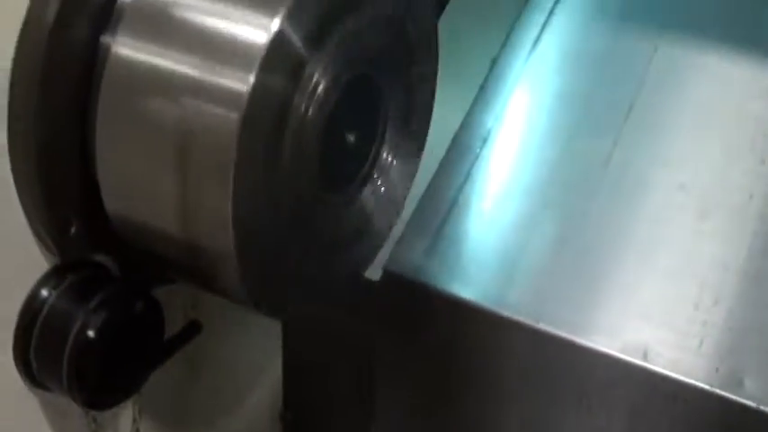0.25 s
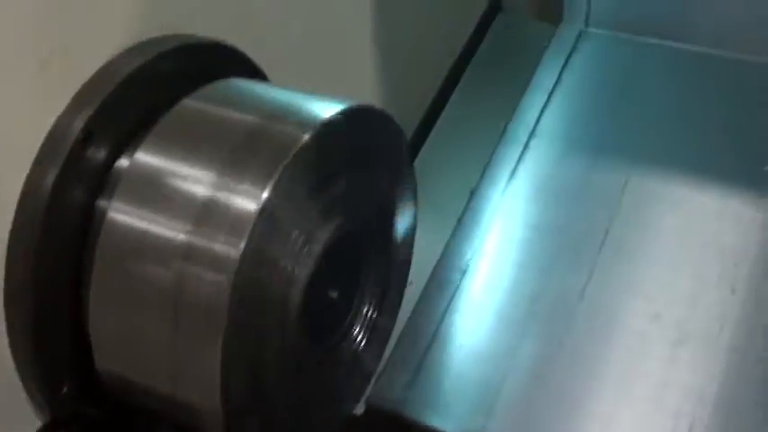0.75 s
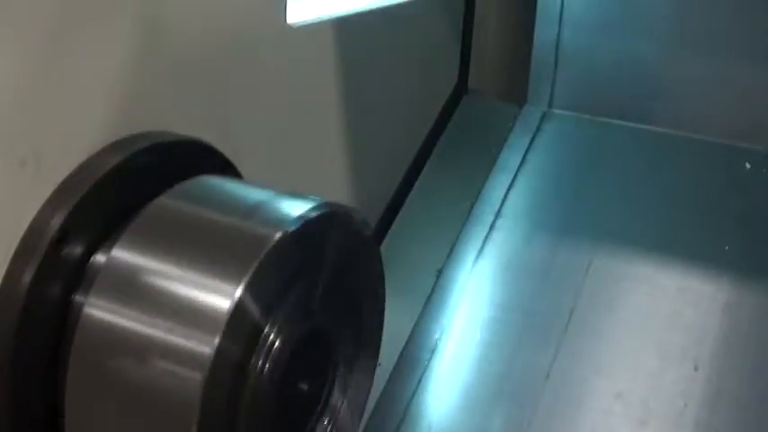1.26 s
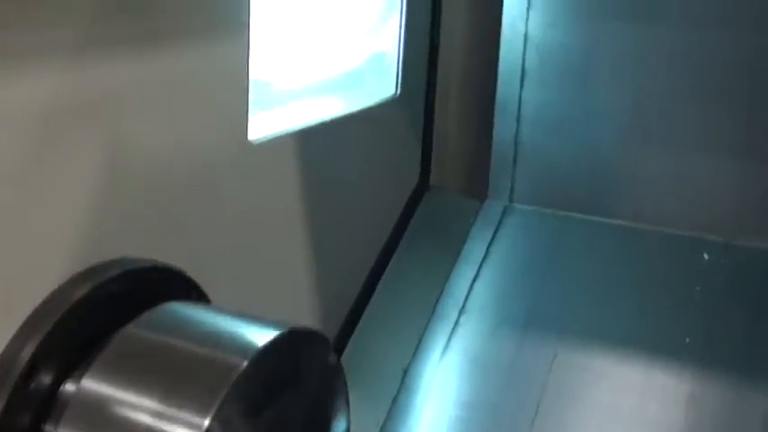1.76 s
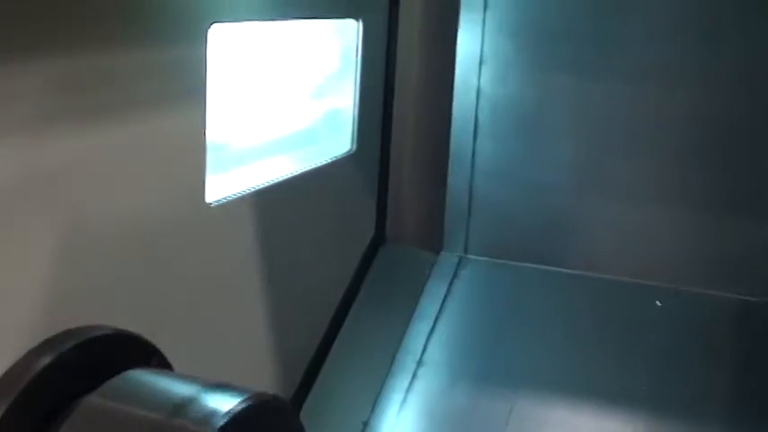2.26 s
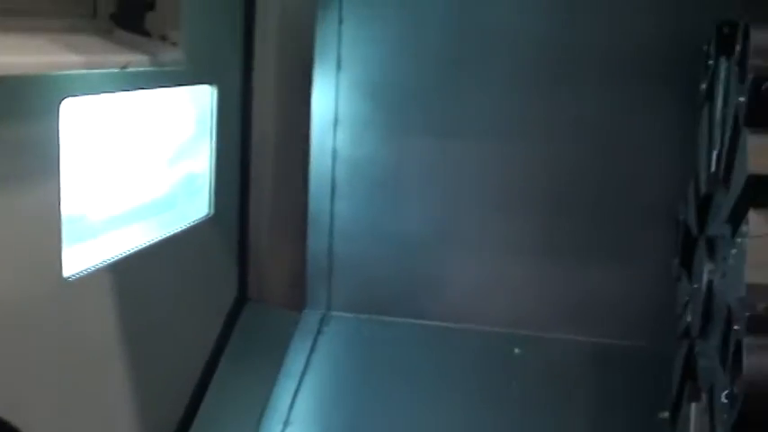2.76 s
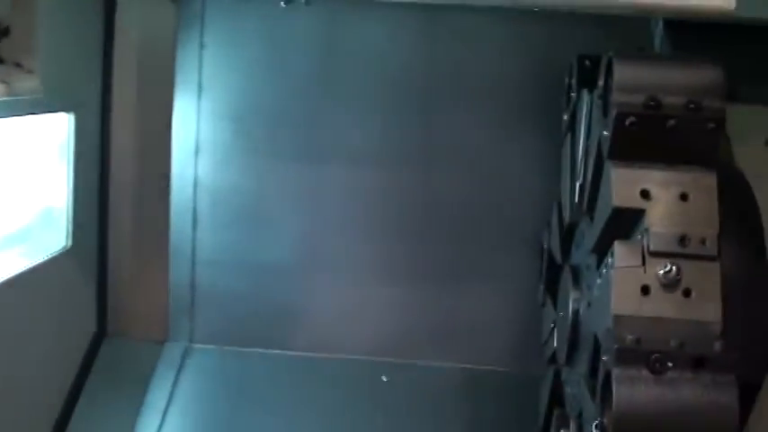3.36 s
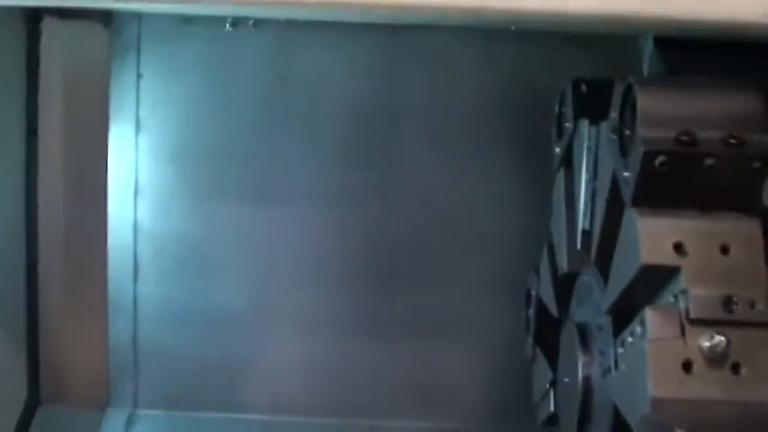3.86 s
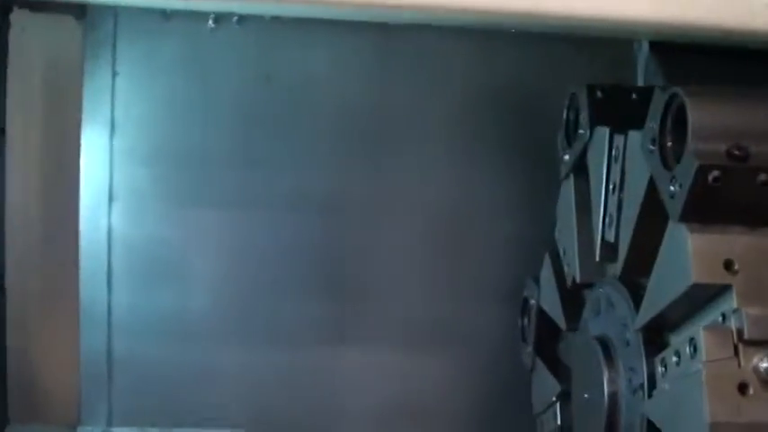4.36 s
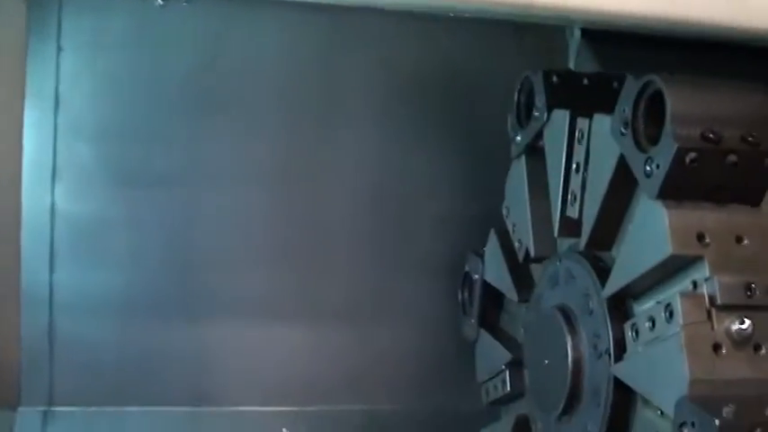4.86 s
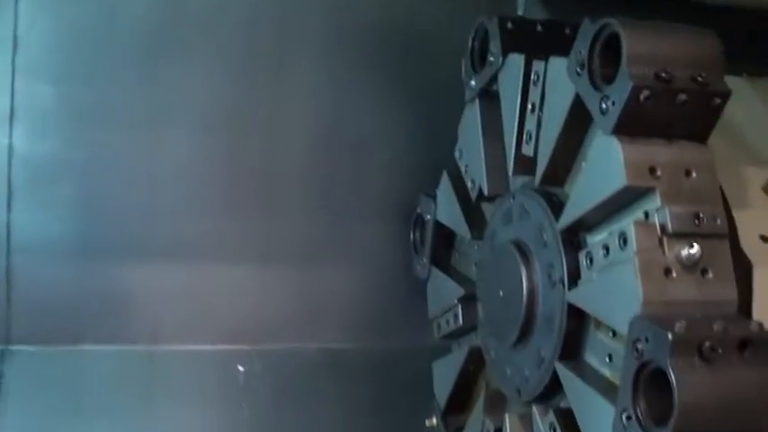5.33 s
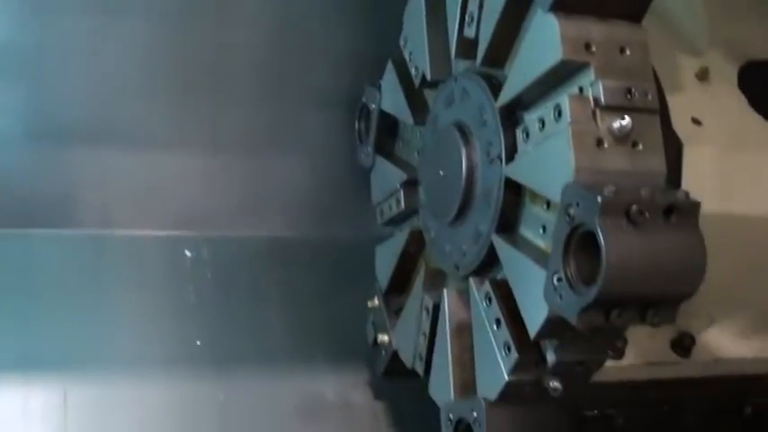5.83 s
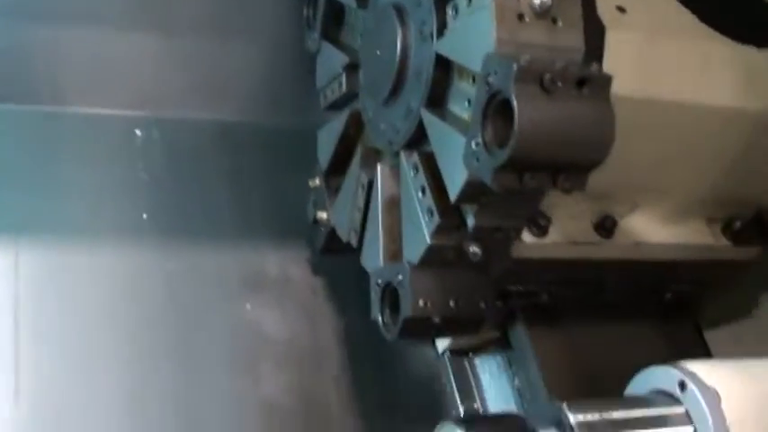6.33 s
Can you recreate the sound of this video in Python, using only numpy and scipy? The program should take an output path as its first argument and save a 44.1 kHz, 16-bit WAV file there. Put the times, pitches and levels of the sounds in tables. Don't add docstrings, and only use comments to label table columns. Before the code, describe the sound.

Inside the metal enclosure of an idling lathe, a hydraulic pump sings a strong, steady mid-pitched whine over a lower throbbing vane tone, motor, belt and gear hum and dull air rush. The whine grows until nearly four seconds, then collapses around four and a half, leaving a duller, lower drone to the end. Close stereo microphone, moving slowly; no cutting or impacts.

```python
import sys
import numpy as np
from scipy import signal
from scipy.fft import rfft, irfft, next_fast_len
from scipy.io import wavfile

SR = 44100
rng = np.random.default_rng(int(sys.argv[2]) if len(sys.argv) > 2 else 0)


def boost_factor(decibels):
    exponent = np.asarray(decibels, float) / 20
    return 10 ** exponent


def unload_wav(signal):
    wavfile.write(
        sys.argv[1],
        SR,
        np.round(np.clip(np.atleast_2d(signal).T, -1, 1) * 32767).astype(np.int16),
    )


N = 290619
RUN_IN = 4096
SIZE = next_fast_len(N + 2 * RUN_IN)
HZ = np.maximum(np.fft.rfftfreq(SIZE, 1 / SR), 1)
TIME = (np.arange(SIZE) - RUN_IN) / SR

PUMP_SHAFT_HZ = 29.753
VANE_HZ = PUMP_SHAFT_HZ * 13
APPROACH_HZ, APPROACH_ENDS_S = .045, 3.4
GEAR_HZ, BELT_HZ, FAN_HZ = 106.8, 8.4265, 419.4


def in_time(rows):
    s, *columns = np.transpose(rows)
    return [np.interp(TIME, s, c) for c in columns]


def at_hz(rows, hz):
    f, *columns = np.transpose(rows)
    return [np.interp(np.log(hz), np.log(f), c) for c in columns]


def drift(rate_hz):
    pole = np.exp(-200 * np.pi * rate_hz / SR)
    noise = rng.standard_normal(SIZE // 100 + 2002)
    slow = signal.lfilter([1], [1, -2 * pole, pole * pole], noise)[2000:]
    slow = slow - slow.mean()
    return np.interp(np.arange(SIZE) / 100, np.arange(len(slow)), slow / slow.std())


def tone(hz, db, turn_lag_s=0.):
    return np.sqrt(2) * boost_factor(db) * np.sin(2 * np.pi * hz * (TIME + turn_lag_s))


def shaft(base_hz, orders, swell_db, turn_lag_s):
    total = np.zeros(SIZE)
    for k, db in orders:
        total += tone(base_hz * k, db + swell_db * drift(0.94), turn_lag_s + rng.random())
    return total


def beating(base_hz, rows):
    return sum(tone(hz, db, (base_hz / hz - 1) * s) for hz, db, s in rows)


def across_node(before_db, after_db, crossing_s, swell_db):
    past = .5 + .5 * np.tanh((TIME - crossing_s) / 0.11)
    return before_db + (after_db - before_db) * past + swell_db * drift(2.6)


# (frequency [Hz], density [dB per Hz])
ENCLOSURE = [(20, -89), (35, -74.5), (55, -69), (75, -69), (105, -61.5), (160, -61), (190, -59.5), (220, -58),
             (260, -57.5), (290, -52.5), (320, -56.5), (365, -53), (400, -63.5), (450, -64.5),
             (520, -63), (580, -61.5), (630, -59), (680, -62), (740, -62), (860, -62.5), (950, -61),
         (1100, -67.5), (1300, -72.5), (1600, -71.5), (1900, -70), (2200, -68.5), (2450, -73.5),
         (2750, -81)]
# (frequency [Hz], density [dB per Hz])
DUCT = [(2750, -80), (3000, -75.5), (3250, -69.5), (3500, -80), (3900, -85.5), (4300, -89.5), (4800, -88.5),
        (5400, -93), (5900, -96), (6350, -96), (6700, -102), (8000, -107), (11000, -120)]
# (frequency [Hz], width [Hz], lift [dB])
WHISTLES = [(1404, 12, 6.5), (1564, 17, 3.5), (3140, 20, -0.5), (3445, 22, 5), (3970, 28, 2.5),
            (4860, 28, 3.5)]


def air_noise():
    per_hz_db, = at_hz(ENCLOSURE + DUCT[1:], HZ)
    for hz, width_hz, lift_db in WHISTLES:
        per_hz_db = per_hz_db + lift_db / (1 + (2 * (HZ - hz) / width_hz) ** 2)
    return rfft(rng.standard_normal(SIZE)) * boost_factor(per_hz_db) * np.sqrt(SR / 2)


def air(patchy_db):
    noise = air_noise()
    place = np.clip(5 * np.log2(HZ / 180), 0, 26)
    dip_db = -1 * np.exp(-((TIME - 2.6) / 1.6) ** 2)
    out = np.zeros(SIZE)
    for k in range(27):
        band = irfft(noise * np.clip(1 - abs(place - k), 0, 1), SIZE)
        level_db = dip_db * (10 < k < 26) + patchy_db * (k > 0) * drift(0.95)
        out += band * boost_factor(level_db)
    return out


def standing_waves(spectrum, ripple_db, width_hz, count):
    grid_hz = np.arange(0, SR / 2 + width_hz, width_hz)
    place = np.linspace(0, count - 1, SIZE)
    combs = rng.standard_normal((count, len(grid_hz)))
    depth_db = ripple_db * np.clip(np.log2(HZ / 500), 0, 1) * (HZ < 7000)
    out = np.zeros(SIZE)
    for k, comb in enumerate(combs):
        coloured = irfft(spectrum * boost_factor(depth_db * np.interp(HZ, grid_hz, comb)), SIZE)
        out += coloured * np.clip(1 - abs(place - k), 0, 1)
    return rfft(out)


# (frequency [Hz], level [dB])
SHOP = [(56.3, -60), (182.4, -53), (343.9, -40), (360.3, -46), (542.4, -48), (687.4, -52), (1030.9, -54),
        (6026, -84), (12000, -86)]


def shop_motors():
    total = np.zeros(SIZE)
    for hz, db in SHOP:
        total += tone(hz, db + 1.4 * drift(1.0), 9.5e-5 * drift(0.38) + rng.random())
    return total


# (frequency [Hz], level [dB], in-step time [s])
CLUSTER = [(288.54, -44, 0), (289.93, -52, .55), (291.94, -49, .156), (295.31, -49, .007),
           (297.97, -50, .043), (298.58, -46, 0)]


def resonance_cluster():
    gain_db = across_node(before_db=-1.5, after_db=2.5, crossing_s=3, swell_db=.5)
    return boost_factor(gain_db) * beating(CLUSTER[0][0], CLUSTER)


# (multiple of blade rate, level [dB])
FAN = [(2, -53), (3, -58), (4, -65), (6, -55), (10, -80), (12, -80)]


def fan():
    return shaft(FAN_HZ, FAN, swell_db=2.2, turn_lag_s=3e-5 * drift(0.55))


# (multiple of belt turn, level [dB])
BELT = [(15, -49), (28, -53), (29, -42), (30, -52), (31, -44), (39, -54), (40, -47), (59, -43), (60, -52),
        (61, -46), (74, -49), (75, -50), (89, -48), (90, -50), (91, -47), (104, -48), (120, -56),
        (121, -56), (134, -53), (135, -55), (136, -55), (150, -65), (151, -64)]
# (frequency [Hz], level [dB], in-step time [s])
NEAR_VANE = [(370.855, -38, .0325), (387.5, -35, .9)]


def belt():
    throb_db = across_node(before_db=-31, after_db=-32.5, crossing_s=0.5, swell_db=-0.7)
    throb = beating(VANE_HZ + APPROACH_HZ, NEAR_VANE + [(BELT_HZ * 45, throb_db, .0405)])
    return throb + shaft(BELT_HZ, BELT, swell_db=1.1, turn_lag_s=1e-4 * drift(0.19))


# (multiple of tooth rate, level [dB])
GEAR = [(1, -50), (4, -39), (10, -61)]
# (frequency [Hz], level [dB], in-step time [s])
NEAR_GEAR = [(202.5, -53, .026), (205.84, -51, .095), (215.27, -48, .23), (215.65, -47, .07),
             (219, -46, .076), (221.93, -51, .006)]


def gear():
    lag_s = 1e-4 * drift(0.05)
    second_db = across_node(before_db=-36, after_db=-34, crossing_s=3.5, swell_db=0.5)
    third_db = across_node(before_db=-38, after_db=-49, crossing_s=4.5, swell_db=0)
    fifth_db = across_node(before_db=-38.5, after_db=-48, crossing_s=5.5, swell_db=1)
    sixth_db = across_node(before_db=-49, after_db=-43.5, crossing_s=3, swell_db=1)
    hum = tone(GEAR_HZ * 2, second_db) + beating(GEAR_HZ * 2, NEAR_GEAR)
    for k, db in ((3, third_db), (5, fifth_db), (6, sixth_db)):
        hum += tone(GEAR_HZ * k, db, lag_s + rng.random())
    return hum + shaft(GEAR_HZ, GEAR, swell_db=0.5, turn_lag_s=lag_s)


# (time [s], vane tone [dB], 2nd multiple [dB], 5th multiple [dB])
WALK = [(0, -33, -22.5, -46), (.4, -34.5, -21, -57), (.9, -32.5, -18.5, -56.5), (1.6, -31, -16.5, -49.5),
        (2.0, -34, -15.5, -57), (2.6, -31, -15, -53), (3.2, -33, -15.5, -53.5), (3.7, -27.5, -13.5, -47.5),
        (4.1, -24.5, -15.5, -57.5), (4.55, -25, -27, -64.5), (4.85, -27, -23, -50),
        (5.2, -30.5, -22, -45.5), (5.9, -32.5, -24, -53), (6.6, -32, -28, -54)]
# (multiple of shaft turn, level [dB])
PUMP = [(9, -51), (12, -51), (15, -53), (16, -49), (24, -54), (25, -55), (28, -49), (29, -50), (30, -52),
        (31, -54), (32, -56), (39, -52), (52, -56), (71, -61), (72, -62), (73, -66), (74, -60), (78, -59),
        (91, -64), (117, -61), (130, -65), (143, -76), (156, -76)]


def pump():
    lag_s = 4e-5 * drift(0.33)
    vane_db, second_db, fifth_db = in_time(WALK)
    approach_lag_s = np.minimum(TIME, APPROACH_ENDS_S) * APPROACH_HZ / VANE_HZ
    whine = tone(VANE_HZ, vane_db, approach_lag_s)
    whine += tone(VANE_HZ * 2, second_db, lag_s)
    whine += tone(VANE_HZ * 5, fifth_db, lag_s)
    return whine + shaft(PUMP_SHAFT_HZ, PUMP, swell_db=2.5, turn_lag_s=lag_s)


# (frequency [Hz], left lag [rad], left-right [dB], unrelated share [0-1])
PORTS = [(40, 0.2, -0.7, 0), (160, 0.2, .5, 0), (400, .5, 0.8, 0), (800, .5, 1.2, 0.01),
         (1070, 0.6, 3, 0.03), (1290, .45, 0, 0.1), (1400, 0.8, 0.7, 0.1), (2000, .3, 0.5, 0),
         (2710, .15, -0.5, .07), (3080, 0.2, -0.5, 0.06), (3800, 0, 0.7, 0), (4300, 0.05, -1, .13),
         (6000, 0.08, -1, .2), (8050, 0, 2, 0.4)]


def scene():
    lag_rad, balance_db, apart = at_hz(PORTS, HZ)
    machines = shop_motors() + resonance_cluster() + fan() + belt() + gear() + pump()
    room_air = standing_waves(rfft(air(patchy_db=0.6)), ripple_db=2.5, width_hz=18, count=12)
    centre = rfft(machines) + np.sqrt(1 - apart) * room_air
    half = boost_factor(balance_db / 2) * np.exp(-.5j * lag_rad)
    centre = centre / np.abs(half + 1 / half) * 2
    side = np.sqrt(apart / 2) * air_noise()
    ports = irfft(np.array([centre * half + side, centre / half - side]), SIZE)
    return ports[:, RUN_IN:RUN_IN + N]


def low_pass(x):
    return signal.sosfilt(signal.butter(12, 15760, fs=SR, output="sos"), x)


def record(dry):
    common = rng.standard_normal(N)
    opposed = boost_factor(-19) * rng.standard_normal(N) * [[1], [-1]]
    hiss = boost_factor(-100.6) * np.sqrt(SR / 2) * (common + opposed)
    return low_pass(dry + hiss)


dry = scene()
out = record(dry)
unload_wav(out)
```